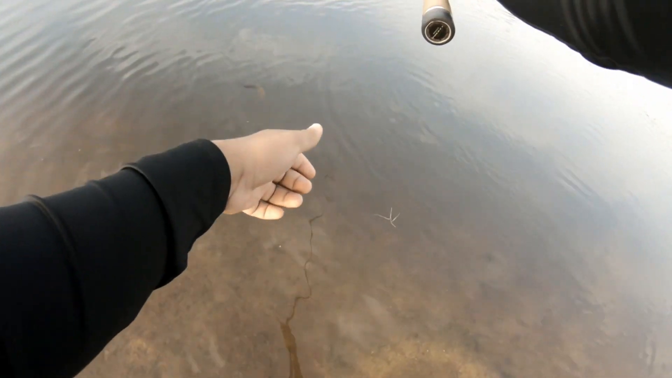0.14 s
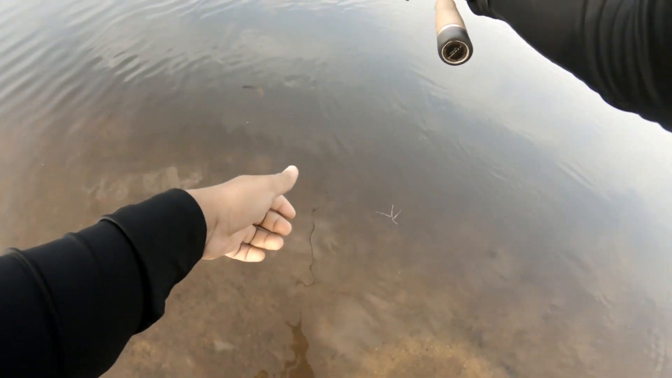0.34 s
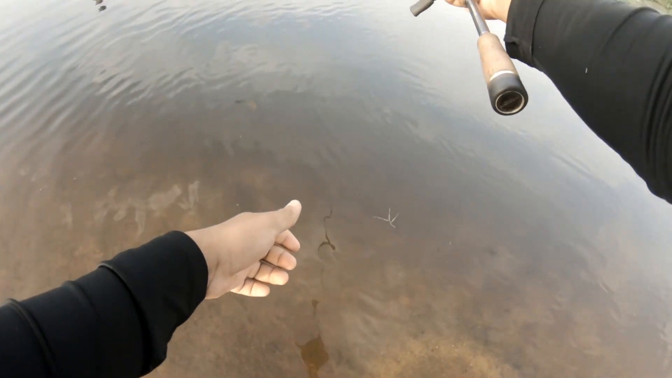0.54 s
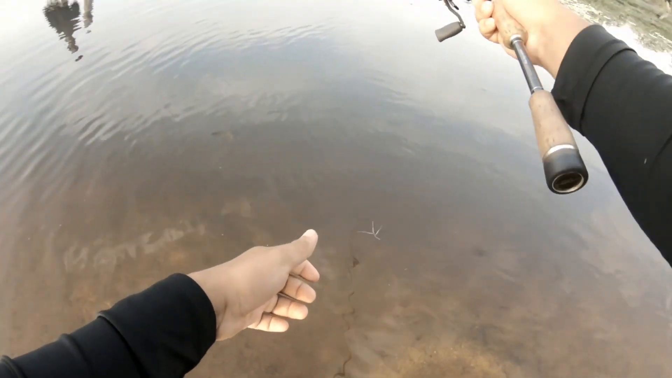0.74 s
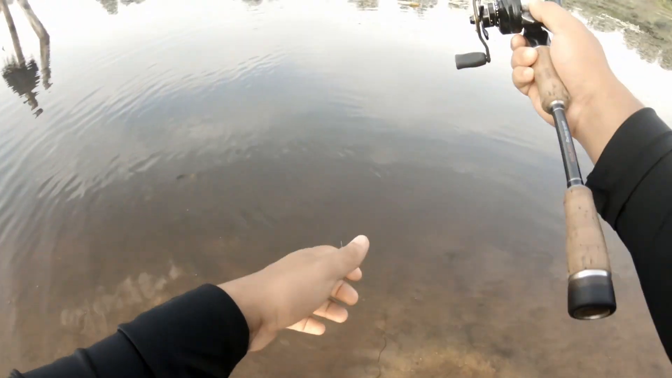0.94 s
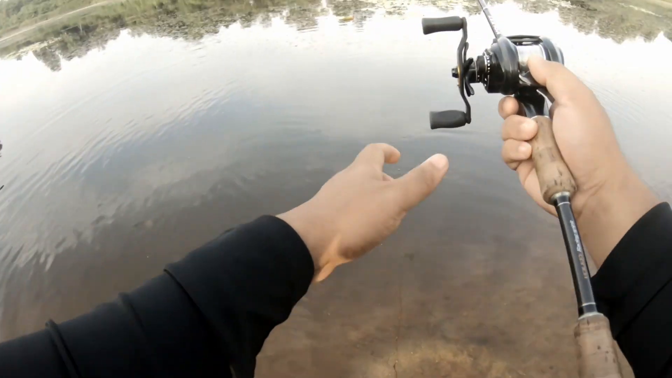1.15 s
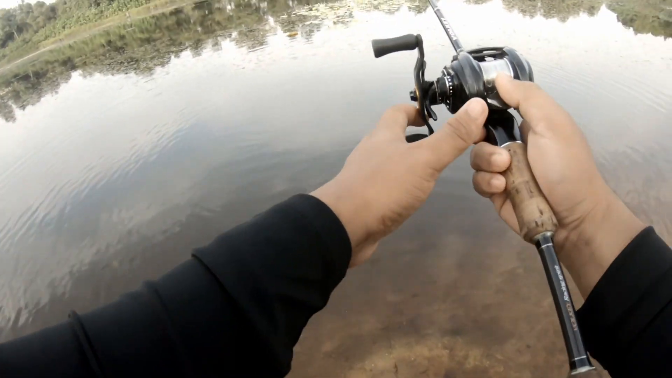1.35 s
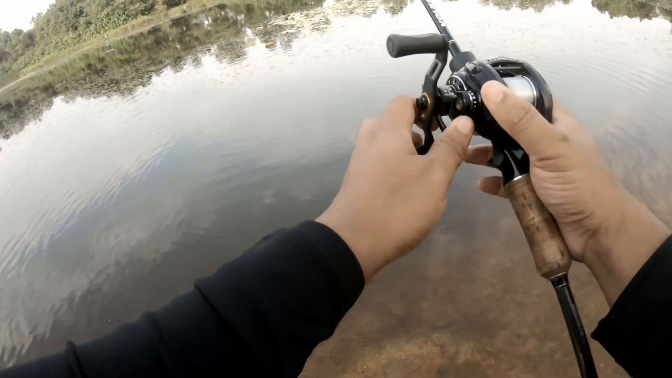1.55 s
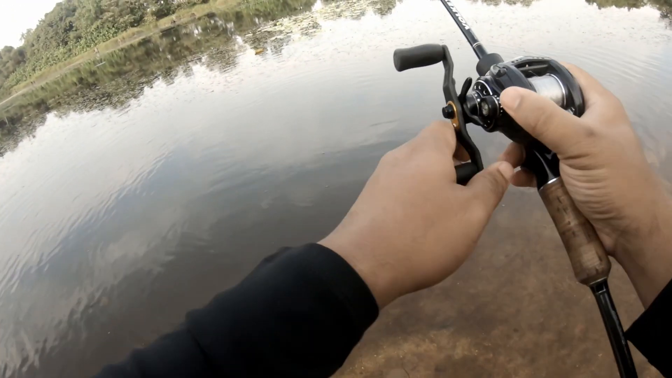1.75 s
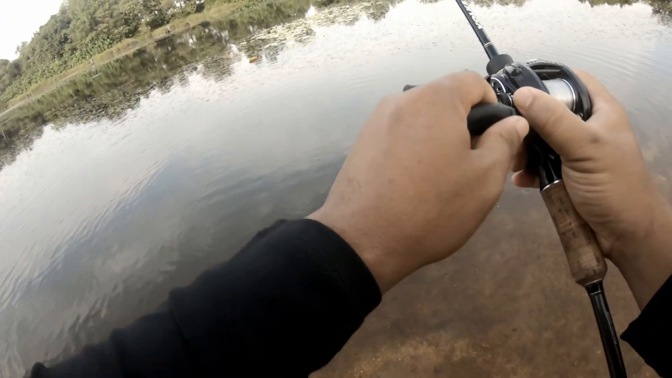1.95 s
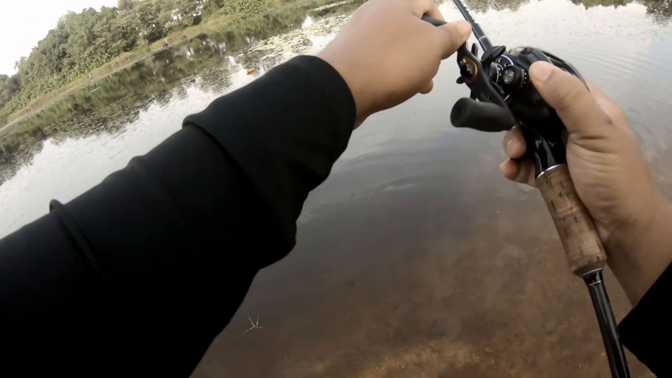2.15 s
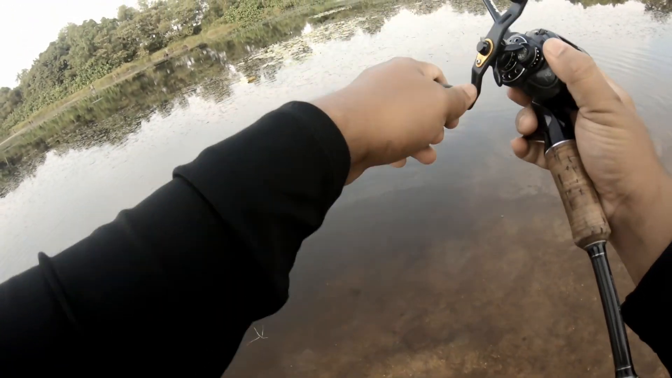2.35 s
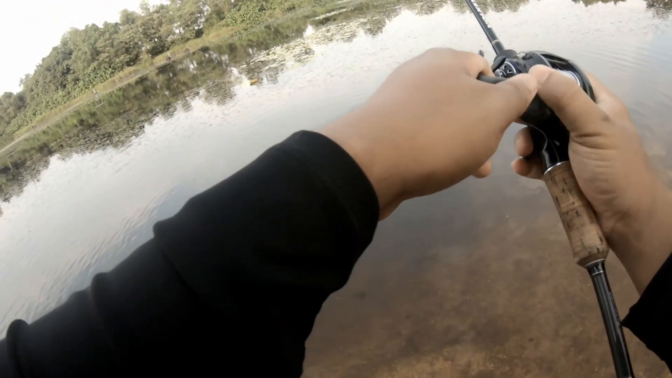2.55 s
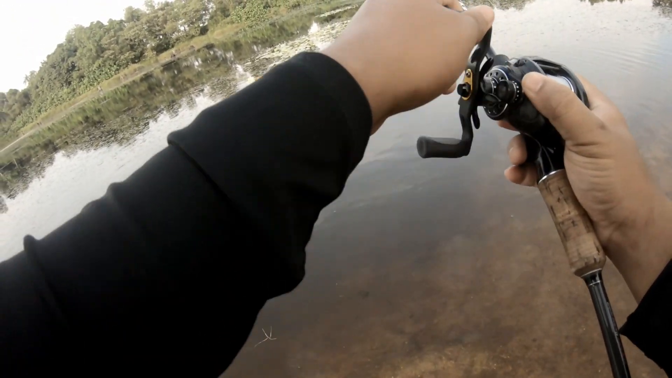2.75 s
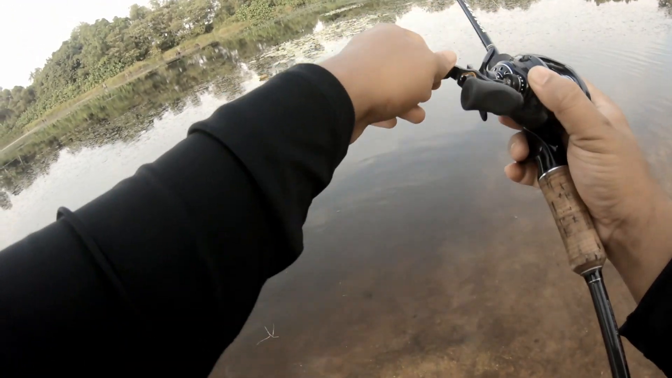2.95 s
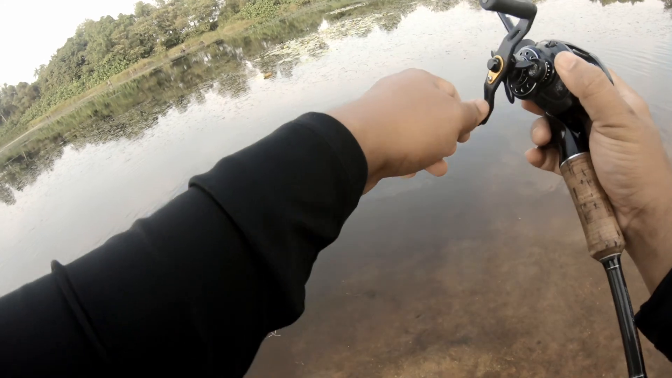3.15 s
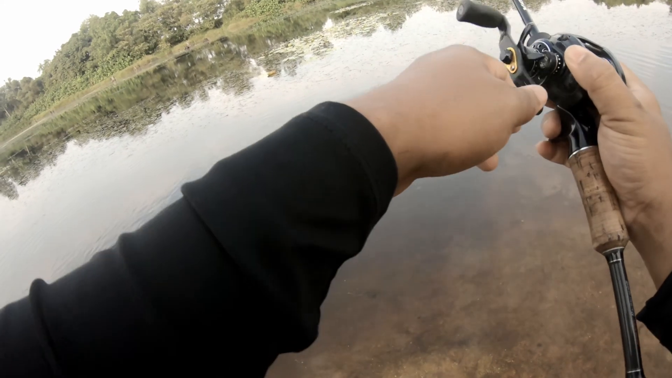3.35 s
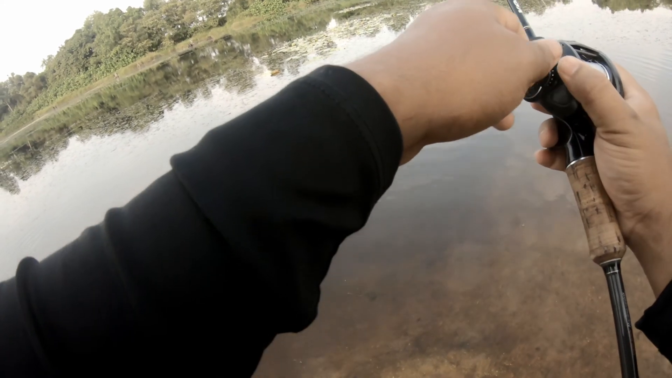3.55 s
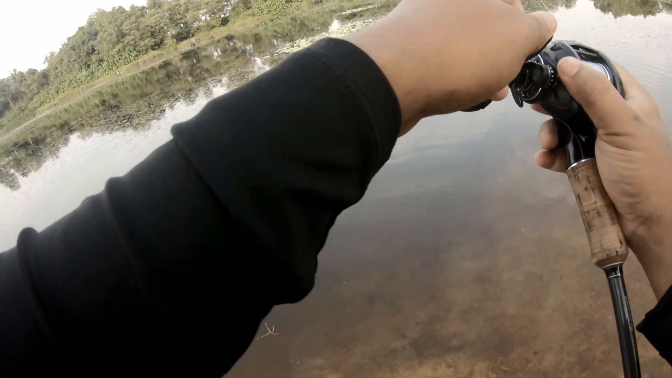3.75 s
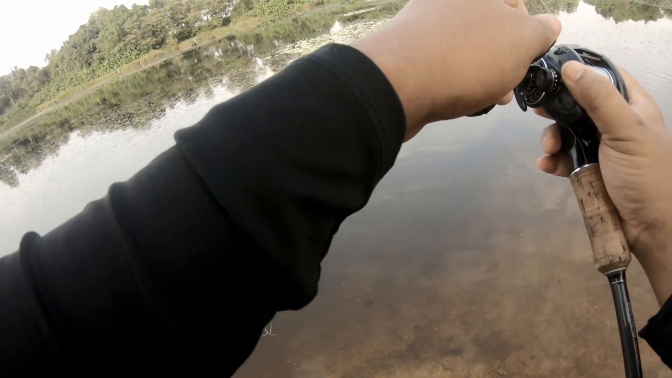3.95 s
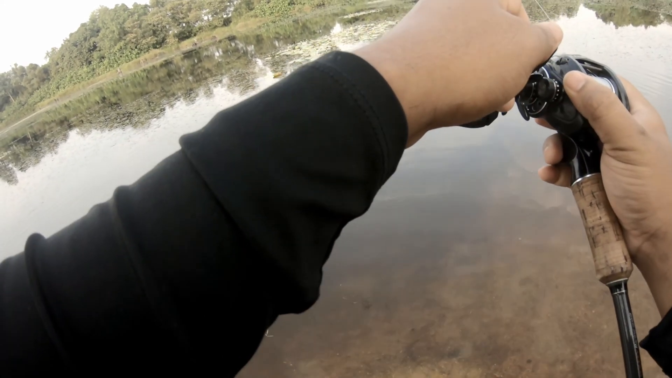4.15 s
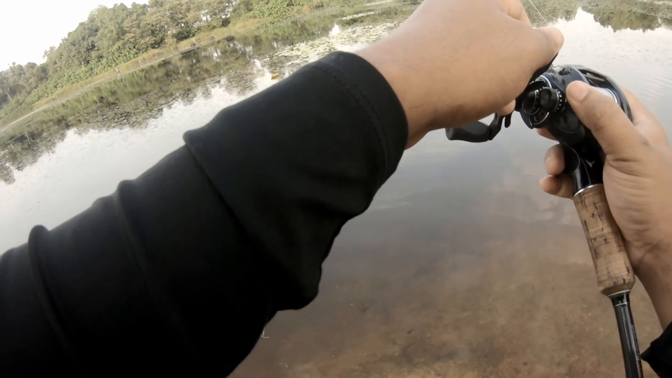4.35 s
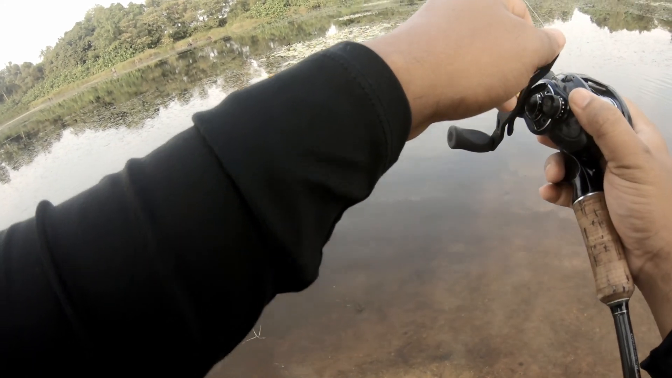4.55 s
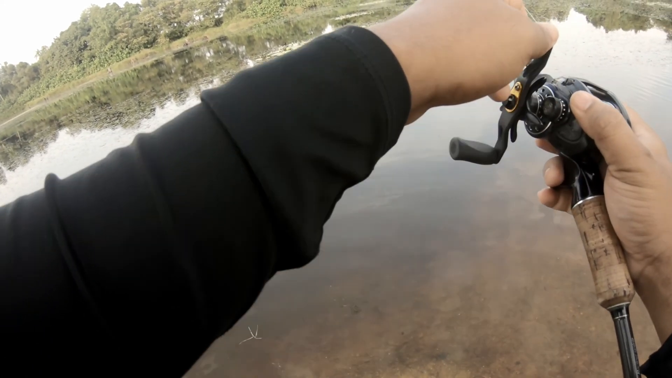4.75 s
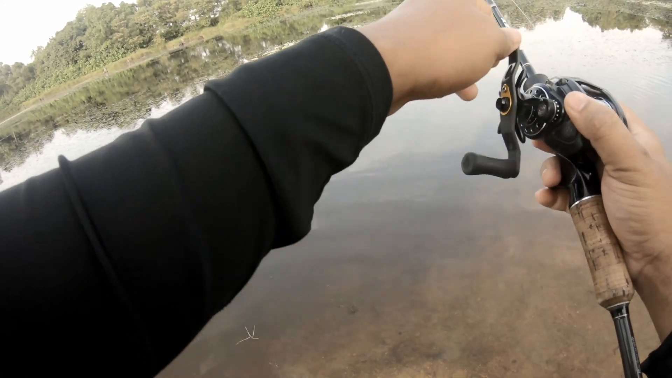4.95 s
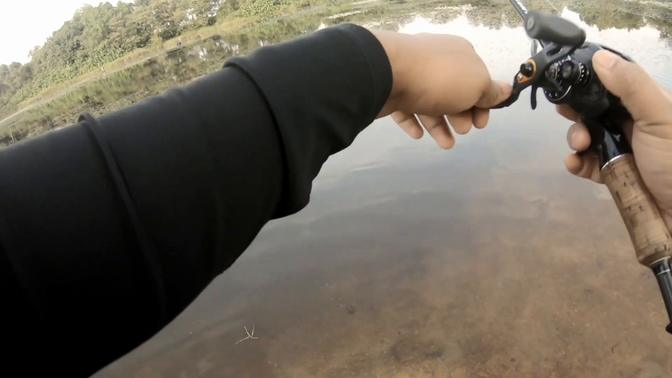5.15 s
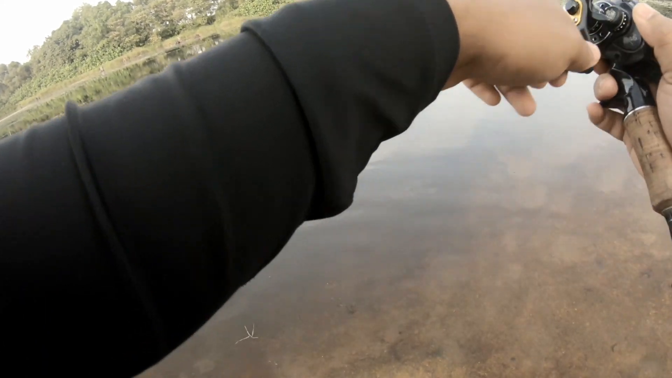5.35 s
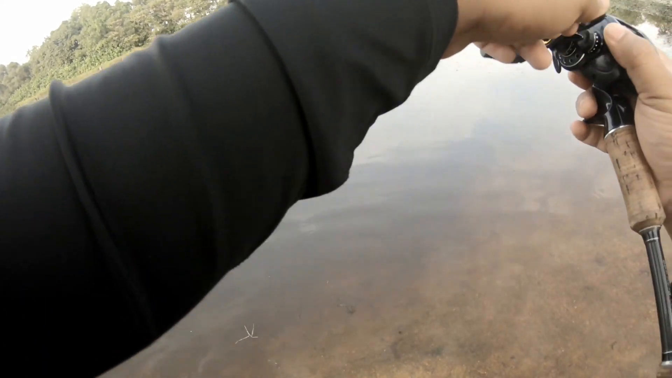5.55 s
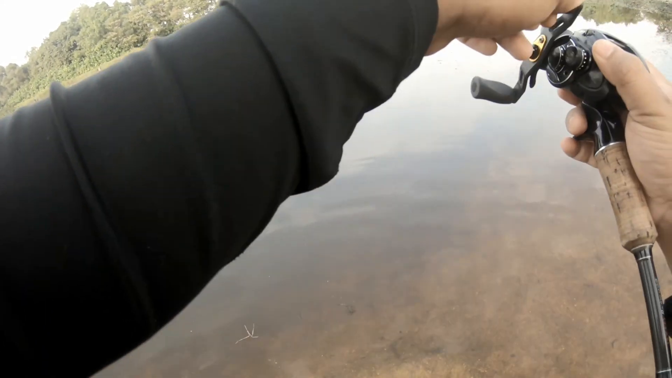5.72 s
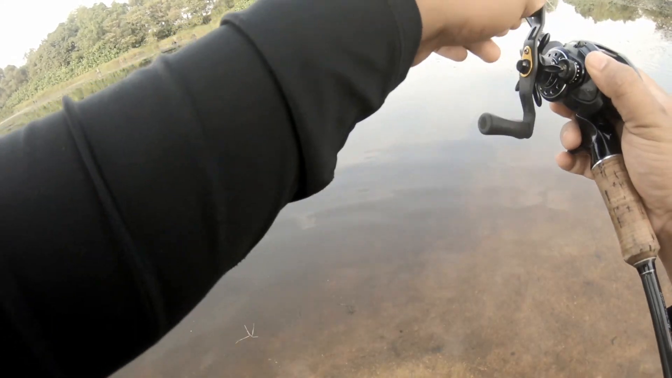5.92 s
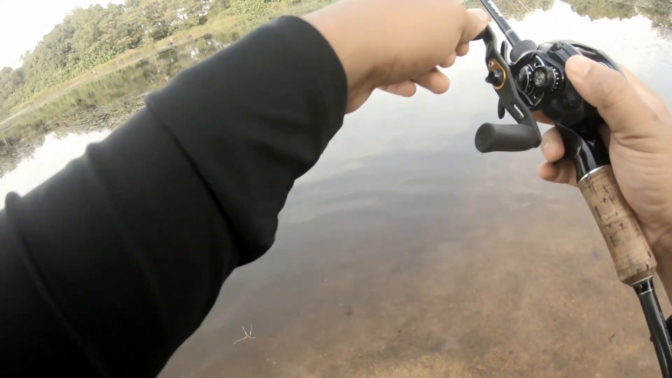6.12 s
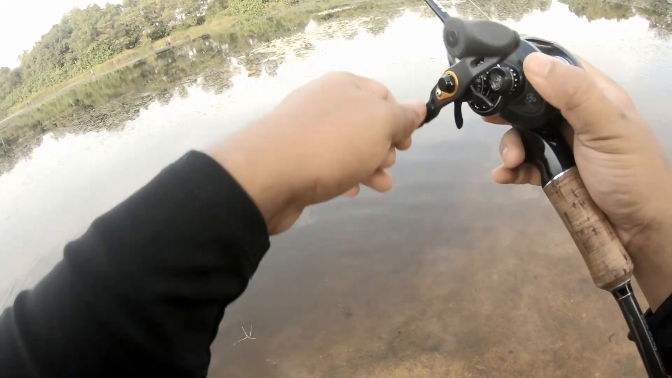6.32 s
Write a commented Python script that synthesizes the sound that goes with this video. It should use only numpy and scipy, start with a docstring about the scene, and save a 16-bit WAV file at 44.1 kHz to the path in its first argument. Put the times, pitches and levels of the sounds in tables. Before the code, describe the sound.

Close by at a pond's edge, line peels off a reel with a soft, fluttering whir, mixed with dull hand bumps and sleeve rubs. A rapid cluster of sharp metallic clacks closes the clutch, followed by a grainy gear purr and a few handle ticks. The slow winding then becomes almost inaudible, leaving songbirds, low outdoor rumble and a thin hiss.

```python
"""A baitcasting reel close by on the bank of a pond: line peels off the whirring spool as shaped noise
and grains, the clutch snaps in as short cracks over a ringing frame, and uneven gear teeth purr through
a slow retrieve. Hands, cloth and rod add bumps, ticks and grainy rubs.
Songbirds, made of wavering near sines with echoes from the trees, call across the water over a shrill
of insects, filtered-noise rumble and air, and a thin top hiss."""
import sys
import numpy as np
from scipy import signal
from scipy.fft import rfft, irfft
from scipy.io import wavfile
from scipy.ndimage import uniform_filter1d

SR = 44100
rng = np.random.default_rng(int(sys.argv[2]) if len(sys.argv) > 2 else 0)


def dump_mix(stems):
    """Bounce the given channels to the path in sys.argv[1] as a 16-bit WAV at rate SR."""
    frames = np.atleast_2d(stems).T  # one column per channel
    limited = np.clip(frames, -1, 1)  # hard clip at full scale
    pcm = np.round(limited * 32767).astype(np.int16)
    wavfile.write(sys.argv[1], SR, pcm)


N = 285768
TIME = np.arange(N) / SR
BITE_S = 1.68  # the gears bite as the clutch closes


def amp(db):
    """Decibels to gain."""
    return 10 ** (np.asarray(db) / 20)


def unit(x):
    """Scales to rms 1."""
    return x / np.sqrt(np.mean(x ** 2) + 1e-20)


def level(rows):
    """Gain along a (s, dB) curve, fading quickly outside it."""
    s, db = np.transpose(rows)
    outside = np.maximum(s[0] - TIME, 0) + np.maximum(TIME - s[-1], 0)
    return amp(np.interp(TIME, s, db)) * np.exp(-outside / 0.0089)


def held(full_s, fade_s, attack_s, release_s):
    """An envelope that swells up to full_s, holds until fade_s and dies away."""
    rise = np.maximum(full_s - TIME, 0) / attack_s
    fall = np.maximum(TIME - fade_s, 0) / release_s
    return np.exp(-rise - fall)


def swell(s, length):
    """A smooth rise and fall round time s."""
    return np.exp(-(2 * (TIME - s) / length) ** 2)


def read(points, hz):
    """A spectrum in dB on a log-frequency axis, falling 40 dB per octave past its ends."""
    point_hz, db = np.transpose(points)
    f = np.log2(point_hz)
    octave = np.log2(hz + 1)
    outside = np.maximum(f[0] - octave, 0) + np.maximum(octave - f[-1], 0)
    return np.interp(octave, f, db) - 40 * outside


def colour(x, points):
    """Gives x a spectral tint, at rms 1."""
    gain = amp(read(points, np.fft.rfftfreq(len(x), 1 / SR)))
    return unit(irfft(rfft(x) * gain, len(x)))


def resonate(x, modes):
    """Passes x through steep-sided resonances (Hz, width Hz, dB), at rms 1."""
    hz = np.fft.rfftfreq(N, 1 / SR)
    body = sum(amp(db) / (1 + 1j * (hz - f) / width) ** 2 for f, width, db in modes)
    return unit(irfft(rfft(x) * body, N))


def causal(points):
    """The most compact causal response that has a given spectrum (minimum phase)."""
    size = 4096
    db = read(points, abs(np.fft.fftfreq(size, 1 / SR)))
    log_gain = np.log(amp(np.maximum(db, -80)))
    return unit(np.fft.ifft(np.exp(np.conj(signal.hilbert(log_gain)))).real) / np.sqrt(size)


def noise():
    """White noise."""
    return rng.standard_normal(N)


def grains(rate, spread_db):
    """Random tiny snaps of uneven size, about rate of them a second."""
    snaps = rng.random(N) < rate / SR
    size = amp(spread_db * np.minimum(rng.exponential(1, N), 4))
    return unit(noise() * snaps * size)


def drift(rate):
    """Smooth random wander of rms 1, slower than about rate in Hz."""
    lowpass = np.exp(-(np.fft.rfftfreq(N, 1 / SR) / rate) ** 2)
    return unit(irfft(rfft(noise()) * lowpass, N))


def add(mix, s, sound):
    """Mixes a sound in at time s."""
    part = mix[max(round(s * SR), 0):][:len(sound)]
    part += sound[:len(part)]


def whistle(hz, rough, waver=0.0083, flicker_db=2.0):
    """A wavering near sine; roughness breaks it into a buzzy twitter."""
    wobble, flicker = (unit(uniform_filter1d(rng.standard_normal(len(hz)), size=size)) for size in (150, 300))
    lowpass = signal.butter(2, 0.12 * hz.mean(), fs=SR)
    rasp = signal.lfilter(*lowpass, rng.standard_normal((2, len(hz))))
    rough = np.clip(rough, 0, 1)
    swing = np.sqrt(1 - rough) + np.sqrt(rough / 2) * (unit(rasp[0]) + 1j * unit(rasp[1]))
    turns = np.cumsum(hz * (1 + waver * wobble)) / SR
    tone = (swing * np.exp(2j * np.pi * turns)).imag
    return np.sqrt(2) * unit(amp(flicker_db * flicker)) * tone


def chirps(rows, length, rough):
    """Short notes (middle s, Hz, dB, sweep in octaves) of one length."""
    song, u = np.zeros(N), np.linspace(-.5, .5, int(length * SR))
    fade = signal.windows.tukey(len(u), .6)
    for s, hz, db, octaves in rows:
        add(song, s - length / 2, amp(db) * fade * whistle(hz * 2 ** (octaves * u), rough))
    return song


def trees(song, t60, onset):
    """Scattered echoes from the bank that build up and die away."""
    t = TIME[:SR]
    taps = rng.standard_normal(SR) * amp(-60 * t / t60) * (1 - np.exp(-t / onset))
    return signal.fftconvolve(song, taps / np.linalg.norm(taps))[:N]


def spool(start_hz=140, stop_hz=45, flutter=0.1, sag_db_per_s=-0.8, waver_db=1.24):
    """Line peels off the slowing spool, fluttering once a turn, and brushes the guides in flight."""
    # Tint of the whir. Each row: frequency in Hz, density in dB per Hz
    whir = [(240, -37), (400, -20), (784, -6), (1190, -5.5), (1420, -10), (1780, -10), (2180, -7),
            (2820, -10.5), (3100, -12), (5100, -2.5), (6860, -15.5), (7640, -14.5), (10000, -56),
            (13000, -66), (22000, -120)]
    turns = np.cumsum(np.interp(TIME, [0, BITE_S], [start_hz, stop_hz])) / SR
    peel = (noise() + 0.73 * grains(2300, 4.5)) * (1 + flutter * np.sin(2 * np.pi * turns))
    guide_modes = [(756, 410, 0.5), (1150, 270, 4.0), (1780, 140, 6.0), (2900, 980, -2.5)]
    guides = resonate(grains(3000, 4.6), guide_modes)
    # the whir sags slowly, then dies away as the line comes taut
    spin = amp(-62.5 + sag_db_per_s * TIME) * held(0, fade_s=2.25, attack_s=1, release_s=0.1)
    # the guides are brushed while the lure is in the air
    flight = amp(-61.5) * held(full_s=0.51, fade_s=1, attack_s=0.22, release_s=0.34)
    return amp(waver_db * drift(3.4)) * (spin * colour(peel, whir) + flight * guides)


def outdoors(rumble_trim_db=-1.0, air_db=-65.5, gust_db=1.5):
    """Gusting low rumble with a far drone in it, and still air, all from filtered noise."""
    # Tint of the rumble. Each row: frequency in Hz, density in dB per Hz
    rumble_tint = [(11, -31.5), (18, -12), (48, -1), (67, -1), (100, -6), (119, -6.5), (145, -5.5),
                   (160, -3.5), (184, -5.5), (217, -6.5), (243, -13), (303, -15), (339, -23), (454, -37.5),
                   (500, -43.5), (650, -92), (1100, -120)]
    # Rumble ride, easing once the rod is held still. Each row: time in seconds, level in dB before the trim
    rumble_ride = [(0, -41), (.3, -39), (.8, -38.5), (1.5, -40), (2.0, -42), (2.5, -45), (3.5, -44),
                   (4.6, -43), (6.25, -42.5), (6.48, -36.5)]
    # Far drone. Each row: frequency in Hz, width in Hz, level in dB
    drone_bands = [(58.1, 3.4, -55.5), (159.4, 7.2, -55)]
    # Tint of the air. Each row: frequency in Hz, density in dB per Hz
    air_tint = [(210, -28.5), (350, 0), (560, -14.5), (790, -8.5), (1030, -20), (1450, -21.5), (2800, -27),
                (4000, -21.5), (4750, -12.5), (5600, -23), (6350, -19), (6850, -25.5), (9200, -26),
                (11000, -34.5)]
    gusts = noise() * amp(gust_db * drift(11.6))
    rumble = amp(rumble_trim_db) * level(rumble_ride) * colour(gusts, rumble_tint)
    drone = sum(amp(db) * resonate(noise(), [(hz, width, 0)]) for hz, width, db in drone_bands)
    return rumble + drone + amp(air_db) * colour(noise(), air_tint)


def insects(hz=7400, width_hz=220, db=-84):
    """A thin steady shrill from the far bank: one narrow band of noise."""
    return amp(db) * resonate(noise(), [(hz, width_hz, 0)])


def top_hiss(hiss_db=-79):
    """A thin hiss at the very top, with one narrow bright band."""
    # Tint of the hiss. Each row: frequency in Hz, density in dB per Hz
    hiss = [(10500, -70), (11400, -23.5), (11900, -5), (12600, -3), (14000, -1.5), (15700, -8.5)]
    # Ride of the bright band. Each row: time in seconds, level in dB
    band_ride = [(0, -86), (3.3, -79), (4, -75.5), (5.2, -74.5), (6.48, -77)]
    band = resonate(noise(), [(11940, 350, 0)])
    return amp(hiss_db) * colour(noise(), hiss) + level(band_ride) * band


def rubs():
    """Sleeve and palm slip in fine grains, with a duller scuff below."""
    # Rubs. Each row: middle in seconds, length in seconds, fizz level in dB, low scuff level in dB
    strokes = [(0.098, 0.27, -68, -69), (0.28, 0.082, -64.5, -86), (0.68, 0.1, -66, -55),
               (0.753, 0.046, -75, -60), (1.458, 0.011, -57, -54), (1.5, 0.054, -68, -63),
               (1.765, 0.32, -64, -56.5), (2.057, 0.049, -78, -62), (4.51, 0.15, -98, -62.5),
               (4.763, 0.53, -90, -61.5), (6.47, 0.25, -66.5, -70)]
    # Tint of the fizz. Each row: frequency in Hz, density in dB per Hz
    fizz_tint = [(1500, -1), (4500, 6), (6500, -7), (8000, -12), (11000, -34), (12500, 6.5), (14500, -6),
                 (16000, -21)]
    fizz = colour(grains(2600, 2), fizz_tint)
    scuff = colour(grains(500, 0.53), [(250, 9.5), (520, 4), (760, -3.5), (1300, -12)])
    return sum(swell(s, length) * (amp(db) * fizz + amp(low_db) * scuff)
               for s, length, db, low_db in strokes)


def whistles(bend=2.1, rough=0.025, taper=0.43, echo_db=-11):
    """Birds' long glides, steep at the top and flat at the bottom."""
    # Each row: start in seconds, length in seconds, start pitch in Hz, end pitch in Hz, level in dB
    glides = [(.01, .15, 2790, 2640, -67), (.08, 0.098, 2600, 1985, -72), (0.801, 0.19, 2330, 3760, -63),
              (0.958, 0.083, 1700, 1860, -62), (1.05, .075, 5020, 5330, -61), (2.592, .11, 1304, 1210, -65),
              (2.839, 0.021, 3080, 3140, -57), (2.9, 0.095, 3510, 2670, -55.5),
              (3.147, .066, 2656, 3560, -59.5), (3.216, 0.082, 3430, 3220, -57),
              (3.308, .035, 5210, 5400, -67), (3.41, 0.034, 2430, 1860, -65),
              (3.542, .1, 1915, 3130, -60.5), (3.621, .05, 3820, 3650, -65.5),
              (3.697, .044, 3950, 3680, -63), (3.73, .1, 2855, 2430, -56.5), (3.805, .11, 2470, 2013, -61),
              (5.589, .08, 1270, 1203, -71)]
    song = np.zeros(N)
    for s, length, start, end, db in glides:
        u = np.linspace(0, 1, int(length * SR))
        climb = u if end > start else 1 - u
        hz = min(start, end) + abs(end - start) * climb ** bend
        add(song, s, amp(db) * signal.windows.tukey(len(u), taper) * whistle(hz, rough))
    return song + amp(echo_db) * trees(song, t60=0.51, onset=0.0093)


def bumps():
    """Dull pushes of hand and rod, a few cycles long, that arrive through the body."""
    # Each row: middle in seconds, peak in dB, frequency in Hz, half length in seconds
    pushes = [(.078, -33, 84, 0.064), (.31, -30, 94, 0.021), (.666, -28.5, 163.4, 0.025),
              (1.11, -36.5, 135.4, 0.059), (1.49, -36.5, 115, 0.037), (1.72, -34, 158, 0.019),
              (1.884, -30.5, 123, 0.019), (3.48, -38.5, 73.4, 0.13), (5.24, -35.5, 51, 0.092)]
    out = np.zeros(N)
    for s, db, hz, half in pushes:
        t = np.arange(-half, half, 1 / SR)
        push = np.hanning(len(t)) * np.sin(2 * np.pi * (hz * t + rng.random()))
        add(out, s - half, amp(db) * push)
    return out


def chatter(count=5, note_s=.035, rise_octaves=0.085, spread_octaves=.09, echo_db=-3):
    """Distant birds scatter small rising notes round one pitch in each bout."""
    # Each row: start in seconds, end in seconds, pitch in Hz, level in dB
    bouts = [(.16, .58, 2900, -63), (0.046, 0.602, 3900, -66), (4.6, 5.5, 2600, -77.5)]
    rows = []
    for start, end, hz, db in bouts:
        for k in range(count):
            s = start + (end - start) * (k + rng.random()) / count
            pitch = hz * 2 ** (spread_octaves * rng.standard_normal())
            rows.append((s, pitch, db, rise_octaves))
    song = chirps(rows, note_s, rough=.2)
    return song + amp(echo_db) * trees(song, t60=0.44, onset=0.011)


def high_birds(echo_db=-4.0):
    """Falling chips, rising zips and arched notes from far off, blurred by echo."""
    # High rising zips. Each row: middle in seconds, pitch in Hz, level in dB
    zip_rows = [(.132, 5780, -52.5), (.722, 5930, -61), (0.74, 5750, -52.5), (1.034, 4700, -60),
                (1.51, 5900, -58)]
    # Sharp falling chips, the last six a sinking run. Each row: middle in seconds, pitch in Hz, level in dB
    chip_rows = [(1.792, 4140, -64), (1.946, 4040, -51.5), (2.018, 3910, -53), (3.198, 4870, -57),
                 (3.295, 4250, -60), (3.405, 4300, -58.5), (3.445, 4160, -49.5), (4.458, 4430, -56),
                 (5.127, 5350, -61), (5.273, 4900, -60), (5.37, 4420, -64), (5.455, 4410, -63),
                 (5.505, 4180, -63), (5.585, 3470, -68)]
    zips = chirps([(s, hz, db, 0.54) for s, hz, db in zip_rows], length=0.037, rough=.45)
    chips = chirps([(s, hz, db, -0.16) for s, hz, db in chip_rows], length=.016, rough=.15)
    song = chips + zips + arches()
    return song + amp(echo_db) * trees(song, t60=0.5, onset=0.004)


def slurs(echo_db=-6, rough=0.081):
    """One bird repeats a slur down and back up, whose held top note lingers among the trees."""
    # Slurs. Each row: start in seconds, length in seconds, level in dB
    calls = [(0.373, .16, -62.5), (1.183, 0.15, -58.5), (1.575, 0.16, -56), (1.982, 0.18, -56),
             (2.402, 0.17, -58), (2.817, .165, -58), (3.261, 0.17, -57.5), (3.739, 0.17, -59)]
    # Shape of each slur. Each row: share of the length, pitch in Hz, level in dB
    shape = [(0, 3850, -6), (.04, 3650, 0), (.13, 2750, -4), (.23, 1900, -19), (.33, 2100, -17),
             (.6, 2750, -7), (.86, 3480, -1), (.93, 3580, -1), (1, 3580, -8)]
    song = np.zeros(N)
    share, pitch, shape_db = np.transpose(shape)
    for s, length, db in calls:
        u = np.linspace(0, 1, int(length * SR))
        gain = amp(db + np.interp(u, share, shape_db)) * signal.windows.tukey(len(u), .07)
        add(song, s, gain * whistle(np.interp(u, share, pitch), rough))
    echo_tint = [(1500, 2), (3300, -1.5), (3600, 9), (4200, -1)]
    bright = amp(read(echo_tint, np.fft.rfftfreq(N, 1 / SR)))
    return song + amp(echo_db) * trees(irfft(rfft(song) * bright, N), t60=0.56, onset=0.008)


def clicks(crack_db=-8, push_db=-8, ring_db=-18, rattle_db=-25, rattle_s=0.016, tick_ms=2.53):
    """Each impact is a push with a short crack, a dying rattle of loose parts and the ring of the frame."""
    # Ticks of handle and rod. Each row: start in seconds, level in dB, treble tilt in dB per octave
    ticks = [(0.665, -38, -5.5), (1.526, -41, 1), (1.871, -33, -11), (1.964, -41, -13), (2.034, -33.5, -5),
             (2.0753, -33, -1), (2.192, -42, -1.5), (2.531, -46, -4), (2.551, -38, -4),
             (2.599, -38.5, -4.5), (3.305, -47.5, -2), (4.696, -44, -1.5), (5.988, -51, -3.5)]
    # Clutch snapping in. Each row: start in seconds, level in dB, decay in ms, treble tilt in dB per octave
    clacks = [(1.6355, -37, 1.0, 1), (1.6517, -21, 1.6, 1.5), (1.6757, -15, 1.7, 1), (1.6779, -8.5, 1.2, 1),
              (1.6882, -9.5, 1.8, .5)]
    # Tint of the crack. Each row: frequency in Hz, density in dB per Hz
    crack_tint = [(200, -14.5), (480, -4), (780, 1.5), (1350, -16), (1870, -4), (2300, -15), (3400, -10),
                  (4100, -2.5), (4900, -10), (6700, -9.5), (7900, -31), (11000, -38), (11900, -14.5),
                  (16000, -19)]
    # Modes of reel frame and rod. Each row: frequency in Hz, level in dB, T60 in seconds
    frame = [(382, -2, .16), (518, -7, .15), (589, -6, .15), (669, -7, .12), (779, -3, .15), (871, -8, .12),
             (1908, -6, .08), (3944, -1, .07), (4252, 0, .07), (4663, -2, .07), (5286, -3, .08),
             (5377, -3, .08), (6056, -4, .07)]
    out, t = np.zeros(N), np.arange(8192) / SR
    impacts = list(clacks) + [(s, db, tick_ms, tilt) for s, db, tilt in ticks]
    for s, db, ms, tilt in impacts:
        decay = np.exp(-t * 1e3 / ms) + amp(rattle_db) * np.exp(-t / rattle_s)
        contact = rng.choice([-1, 1], len(t)) * decay
        # the push lands half a decay time in
        contact[int(ms * SR / 2000)] += amp(push_db) * np.linalg.norm(contact)
        tilted = [(f, d + tilt * np.log2(f / 3000)) for f, d in crack_tint]
        crack = signal.fftconvolve(contact, causal(tilted))[:len(t)]
        ring = sum(amp(d + tilt * np.log2(f / 3000) - 60 * t / t60) * np.sin(2 * np.pi * f * t)
                   for f, d, t60 in frame)
        add(out, s, amp(db) * (amp(crack_db) * crack + amp(ring_db) * ring / abs(ring).max()))
    return out


def clutch():
    """The pinion scrapes along its shaft between the clacks: grit through the frame's bright resonances."""
    # Each row: time in seconds, level in dB
    scrape = [(1.635, -54.5), (1.655, -42), (1.672, -44.5), (1.69, -37)]
    return level(scrape) * resonate(grains(5700, 1.5), [(5640, 310, -3.5), (6200, 140, -5.0), (690, 400, -3.0)])


def gears(gear_trim_db=1, mesh_hz=85, slide=1.38, uneven_db=2.0, grip_db=3.5):
    """Teeth mesh unevenly and ring the gearbox as the hand's pressure varies; line slides onto the spool."""
    # Effort of the hand on the handle. Each row: time in seconds, level in dB before the trim
    effort = [(1.68, -59), (1.98, -64), (2.08, -53), (2.18, -67.5), (2.55, -63.5), (2.7, -70), (3.15, -78),
              (4.3, -80), (4.48, -70.5), (5.2, -70), (5.6, -71.5), (6.48, -70.5)]
    # Tint of the gearbox. Each row: frequency in Hz, density in dB per Hz
    gearbox = [(330, -4), (400, 0), (470, 1.5), (560, -2), (690, 6), (860, 6.5), (950, -4.5), (1050, -1.5),
               (1170, -9), (1600, -12), (2600, -26)]
    # Wet line sliding onto the spool. Each row: middle in seconds, length in seconds, level in dB
    swishes = [(2.75, 1.7, -71), (4.692, 0.21, -69), (5.11, 0.2, -67.5), (5.41, 0.19, -68),
               (6.44, 0.52, -63.5)]
    teeth = np.cumsum(mesh_hz * (1 + .25 * drift(5))) / SR
    knocks = np.diff(np.floor(teeth), prepend=0) * amp(uneven_db * noise())
    purr = colour((unit(knocks) + slide * noise()) * amp(grip_db * drift(32)), gearbox)
    line_tint = [(900, 2.5), (1800, -2.5), (3200, -5.0), (4700, -2.0), (6300, -3.0), (8000, -30)]
    sliding = colour(grains(3000, 0.7), line_tint)
    # a hard bite as the clutch closes, gone at once
    bite = amp(-40.5) * held(BITE_S, BITE_S, attack_s=.003, release_s=0.027)
    load = amp(gear_trim_db) * level(effort) + bite
    return load * purr + sum(amp(db) * swell(s, length) for s, length, db in swishes) * sliding


def grainy_purr(db=-58, fade_s=2.05, release_s=.12, flicker_db=2.5):
    """A dense, grainy purr of the gears at about 700-1100 Hz, held after the clutch closes, then fading."""
    grit = grains(1500, 1.9) * amp(flicker_db * drift(40))
    envelope = held(BITE_S, fade_s, .003, release_s)
    return amp(db) * envelope * resonate(grit, [(790, 84, -2), (977, 83, 0)])


def low_birds(echo_db=-10):
    """Pips swept through one pitch and runs of low rising coos."""
    # Coos. Each row: middle in seconds, level in dB
    coo_rows = [(2.688, -61), (2.766, -63), (2.879, -61), (3.05, -67), (5.064, -59.5), (5.168, -60.5),
                (5.256, -64), (5.372, -67), (5.44, -70)]
    # Pips. Each row: middle in seconds, level in dB, sweep in octaves
    pip_rows = [(4.032, -63, -0.22), (4.068, -60, .16), (4.152, -62.5, -0.28), (4.208, -61.5, 0.27),
                (4.292, -64, -0.091), (4.366, -60.5, .4), (4.45, -60.5, 0.26), (4.526, -60.5, 0.28),
                (5.923, -60.5, 0.23), (5.957, -67.5, 0.31)]
    coo_hz, coo_octaves, pip_hz = 1020, .3, 2040
    pips = chirps([(s, pip_hz, db, octaves) for s, db, octaves in pip_rows], length=.025, rough=0.18)
    coos = chirps([(s, coo_hz, db, coo_octaves) for s, db in coo_rows], length=0.031, rough=0.1)
    return pips + coos + amp(echo_db) * trees(pips + coos, t60=.4, onset=0.0071)


def arches(rough=0.16, length=.046, db=-70.5, drop=1.15, peak_at=.38):
    """Notes that rise to a peak and drop away along a parabola."""
    # Each row: middle in seconds, peak pitch in Hz
    notes = [(5.534, 3230), (5.64, 3200), (5.705, 3560), (5.768, 3470), (5.82, 3080)]
    song, u = np.zeros(N), np.linspace(0, 1, int(length * SR))
    fade = signal.windows.tukey(len(u), .5)
    for s, hz in notes:
        pitch = hz * (1 - drop * (u - peak_at) ** 2)
        add(song, s - length / 2, amp(db) * fade * whistle(pitch, rough))
    return song


def scene():
    """Reel and pond lie in the middle; each side has its own top hiss."""
    reel = clicks() + clutch() + bumps() + spool() + gears() + grainy_purr() + rubs()
    pond = whistles() + slurs() + high_birds() + low_birds() + chatter() + insects() + outdoors()
    return np.array([reel + pond + top_hiss(), reel + pond + top_hiss()])


def record(dry, top_db=1.5, edge_hz=16000):
    """The microphone lifts the top octave, where its two ports differ; then the band limit."""
    # The two ports. Each row: frequency in Hz, left leads by radians, left louder by dB
    port_rows = [(0, 0, 0), (6800, 0, 0), (8500, .1, 3), (10500, .1, 3.5), (11800, 1.1, 2),
                 (16000, 1.7, 1.8)]
    hz = np.fft.rfftfreq(N, 1 / SR)
    f, lead, louder = np.transpose(port_rows)
    side = np.array([[.5], [-.5]])  # half of each difference to the left, half to the right
    lift = np.minimum(hz / 11500, 1) ** 4
    gain = amp(top_db * lift + side * np.interp(hz, f, louder))
    ports = gain * np.exp(1j * side * np.interp(hz, f, lead))
    wide = irfft(rfft(dry) * ports, N)
    lowpass = signal.firwin(201, edge_hz, window=("kaiser", 8), fs=SR)
    return signal.oaconvolve(wide, lowpass[None], "same")


dry = scene()
out = record(dry)
dump_mix(out)
```